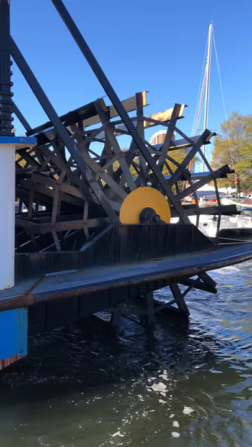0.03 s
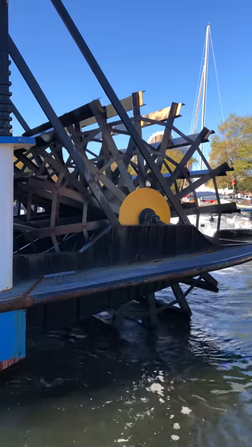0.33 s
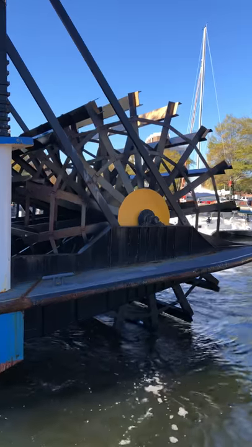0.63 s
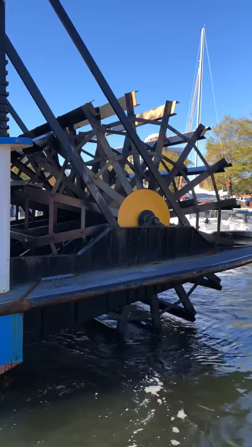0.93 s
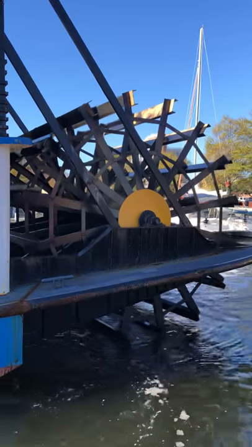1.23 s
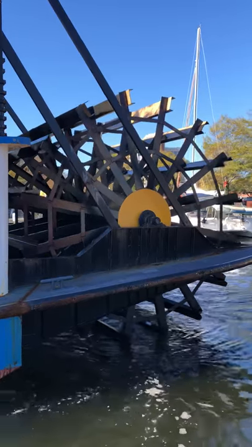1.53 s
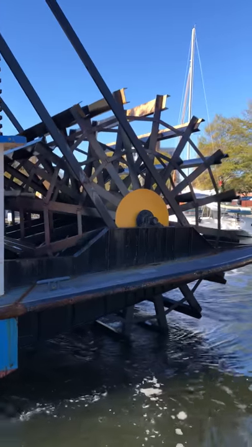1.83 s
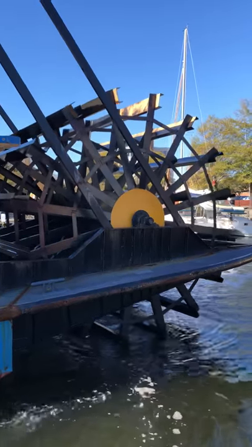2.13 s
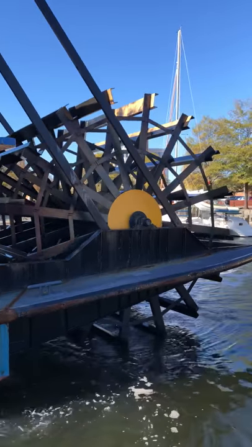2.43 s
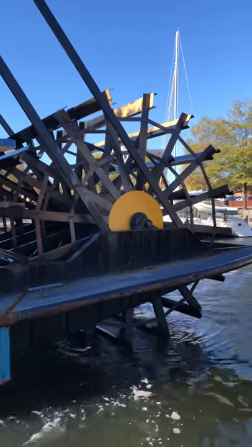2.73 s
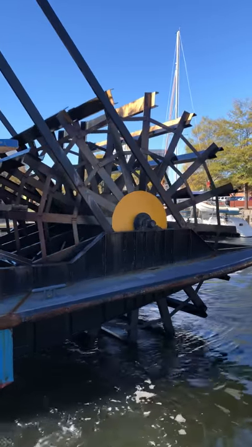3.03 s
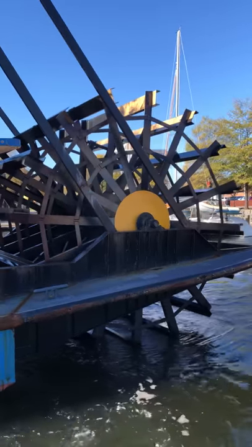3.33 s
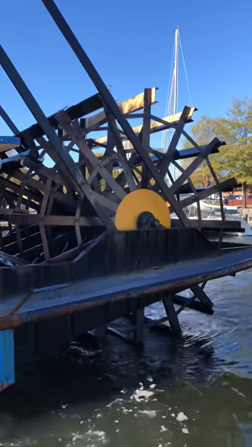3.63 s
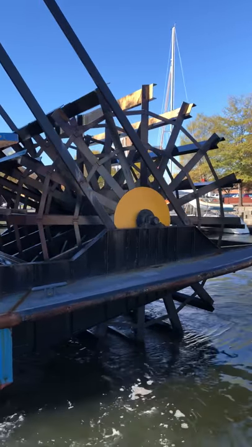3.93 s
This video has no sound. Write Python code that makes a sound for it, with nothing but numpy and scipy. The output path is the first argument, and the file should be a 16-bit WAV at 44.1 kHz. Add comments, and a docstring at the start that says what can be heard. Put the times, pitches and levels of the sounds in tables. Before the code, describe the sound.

Boat engines drone and rumble throughout, heard from beside the paddle wheel on a river. Faint whines and softly bubbling water lie underneath, with small scattered splashes and, toward the end, a few short drips.

```python
"""Paddle boat at the stern wheel

Two diesel exhausts throb slightly out of step and beat, until one fades from earshot.
Hull rumble, generator hum, machinery roar and thin whines lie under them.
The slow wheel churns the river: hiss, splashes, and drips whose trapped bubbles ring."""
import sys
import numpy as np
from scipy import signal
from scipy.fft import rfft, irfft
from scipy.io import wavfile
from scipy.ndimage import uniform_filter1d

SR = 44100
rng = np.random.default_rng(int(sys.argv[2]) if len(sys.argv) > 2 else 0)


def generate_wav(signal):
    """Clip the signal to [-1, 1] and save it as 16-bit WAV at the path in sys.argv[1]."""
    frames = np.transpose(np.atleast_2d(signal))
    scaled = np.clip(frames, -1, 1) * 32767
    pcm = np.round(scaled).astype(np.int16)
    wavfile.write(sys.argv[1], SR, pcm)


N = 176400

# near engine speed (time [s], firing rate [Hz])
NEAR_FIRING_HZ = [(0.2, 55.61), (0.45, 55.44), (0.8, 55.75), (1.3, 55.88), (1.9, 55.72), (2.4, 55.81),
                  (2.9, 55.65), (3.4, 55.83), (3.8, 55.84)]
# exhaust lines (order [multiple of shaft rate])
ORDERS = (5, 6, 7, 9, 10, 11, 12, 15, 16, 18, 20, 23, 24, 27, 30)
# line strengths per engine, one per order (base level [dB])
NEAR_LINES_DB = [-40, -24.5, -31, -22, -41, -27.5, -24, -21, -40.5, -37, -39.5, -41, -40.5, -52.5, -43.5]
FAR_LINES_DB = [-44, -24.5, -32, -26, -43, -32, -27.5, -24.5, -41, -35, -41, -45, -40, -49, -49]
# near lines that swell and sink (order [multiple of shaft rate])
SWELL_ORDERS = (6, 9, 15)
# their swells (time [s], gain [dB] for each of SWELL_ORDERS)
SWELLS_DB = [(.3, 2.4, -3, -2), (.7, 0.34, -0.93, -0.63), (1.1, 1.9, -1.9, 2.8), (1.5, -0.23, 1.7, 1.3),
             (2.2, -.5, 0.96, -0.83), (3, -0.12, -0.72, -1.45), (3.8, -2.7, .5, -0.28)]
# each exhaust at the listener (time [s], gain [dB])
NEAR_GAIN_DB = [(.1, -0.5), (.6, -1.5), (1.2, 0.6), (1.8, -0.7), (2.3, -0.1), (3.1, -0.24), (3.9, 2.1)]
FAR_GAIN_DB = [(.1, -.5), (.9, 1), (1.15, 0), (1.45, -10), (1.8, -16), (4, -19)]
# hull rumble, machinery roar, churned water (frequency [Hz], relative density [dB])
RUMBLE_SPECTRUM = [(20, -35), (32, -30), (43, -11), (58, -7), (75, -11.5), (92, -5.5), (135, -1.5),
                   (240, -2.5), (300, -1.5), (370, -9), (520, -23), (1200, -71)]
ROAR_SPECTRUM = [(150, -6), (420, 0), (520, -3), (640, -2), (820, -4), (1050, -8), (1350, -12.5),
                 (1700, -15), (2050, -20), (2400, -26.5), (4000, -35.5), (9000, -55.5)]
WASH_SPECTRUM = [(500, -10.5), (1500, 3.5), (2800, -0.5), (4000, -3), (5300, -4), (7000, -8), (8700, -10.5),
                 (10000, -14.5), (12000, -16.5), (15500, -23.5)]
# machinery whines (frequency [Hz], level [dB])
WHINE_TONES = [(569, -47), (1997, -60.5), (2110, -55)]
# water off the paddles (start [s], level before envelope [dB], decay [s], centre [Hz])
PADDLE_SPLASHES = [(.65, -49, 0.023, 6000), (.82, -45, .1, 3300), (1.206, -52, 0.23, 5200),
                   (1.808, -45, .04, 4000), (1.92, -48.5, .1, 4800), (2.51, -51, .03, 8000),
                   (2.596, -46, 0.077, 4200), (3.022, -53, .04, 7000), (3.086, -49, 0.036, 5000),
                   (3.244, -48, .04, 4500), (3.503, -51, 0.039, 6000), (3.613, -49, .02, 3800),
                   (3.71, -52, .03, 4000), (3.804, -39, .03, 3700)]
# fat drips (start [s], peak level [dB], initial pitch [Hz])
FAT_DRIPS = [(2.597, -40, 3300), (2.981, -32, 2650), (3.612, -32, 2750), (3.817, -39, 4250)]


def exhaust(firings, lines_db, swells_db, firings_per_turn=3, scatter_db=1.0):
    """One pressure pulse per firing, smeared by pipe and air; unequal cylinders add shaft orders."""
    strength = undb(scatter_db * np.interp(firings - firings[0], np.arange(400), rng.standard_normal(400)))
    shaft_rad = 2 * np.pi * firings / firings_per_turn
    tone = 0
    for order, db in zip(ORDERS, lines_db):
        smear_rad = .018 * (order - 11) ** 2 + .035 * walk(4.35)
        wave = np.sin if order % firings_per_turn else np.cos  # unevenness falls beside the firing peak
        gain = undb(db + swells_db.get(order, 0) + .5 * walk(4.7))
        tone += gain * wave(order * shaft_rad + smear_rad)
    return -np.sqrt(2) * tone * strength


def engines(t, far_firing_hz=54.08, in_step_s=.9805, far_lag_s=.0002):
    """Two diesels; the far one runs steadily and a little slower, so the pair beats."""
    near_firings = np.cumsum(curve(t, NEAR_FIRING_HZ)) / SR
    near_firings -= np.interp(in_step_s, t, near_firings)
    far_firings = far_firing_hz * (t - in_step_s - far_lag_s)
    times_s, *columns_db = np.array(SWELLS_DB).T
    swells_db = {order: np.interp(t, times_s, db) for order, db in zip(SWELL_ORDERS, columns_db)}
    near = exhaust(near_firings, NEAR_LINES_DB, swells_db) * undb(curve(t, NEAR_GAIN_DB))
    far = exhaust(far_firings, FAR_LINES_DB, {}) * undb(curve(t, FAR_GAIN_DB))
    return near + far


def machinery(t, rumble_db=-22.5, roar_db=-27, hum_db=-37, hum_hz=60.6):
    """Hull rumble, fluttering roar, generator hum and wavering whines."""
    rumble = noise(RUMBLE_SPECTRUM) * undb(rumble_db)
    roar = noise(ROAR_SPECTRUM) * undb(roar_db + .87 * walk(45.07))
    tones = undb(hum_db) * np.sin(2 * np.pi * hum_hz * t)
    for hz, db in WHINE_TONES:
        gain = undb(db + 2 * walk(5.13))
        pitch_hz = hz * (1 + .00298 * walk(20))
        tones += gain * np.sin(2 * np.pi * np.cumsum(pitch_hz) / SR)
    return rumble + roar + np.sqrt(2) * tones


def wash(level_db=-43.5):
    """Water stirred by the wheel hisses, with slight swell and flicker."""
    return noise(WASH_SPECTRUM) * undb(level_db + .5 * walk(4.6) + .5 * walk(60))


def splashes(t, attack_s=.0032, width_ratio=1.17, grain_db=.5):
    """Sheets of water slap the river: quick rise, then grainy, fading spray."""
    out = np.zeros(N)
    for start_s, db, decay_s, hz in PADDLE_SPLASHES:
        age_s = np.maximum(t - start_s, 0)
        envelope = (1 - np.exp(-age_s / attack_s)) * np.exp(-(age_s / decay_s) ** 2)
        grains = rng.standard_normal(N) * undb(-grain_db * walk(700))
        band = signal.iirpeak(hz, 1 / width_ratio, fs=SR)
        spray = signal.lfilter(*band, signal.lfilter(*band, grains))
        out += level(spray, db) * envelope
    return out


def drips(t, decay_s=.0045, chirp_per_s=3.4):
    """Each fat drip traps a bubble that rings and rises in pitch."""
    out = np.zeros(N)
    for start_s, db, hz in FAT_DRIPS:
        age_s = np.maximum(t - start_s, 0)
        phase_rad = 2 * np.pi * hz * age_s * (1 + chirp_per_s * age_s)
        out += undb(db) * np.exp(-age_s / decay_s) * np.sin(phase_rad)
    return out


def bubbles(rate_per_s=500, low_hz=1500, high_hz=12000, decay_cycles=6.1, tilt_db_per_oct=-3, level_db=-52):
    """Many tiny bubbles ring briefly and rise in pitch."""
    out = np.zeros(N + SR)
    for when, pitch, size, ring in rng.random((int(rate_per_s * N / SR), 4)):
        hz = low_hz * (high_hz / low_hz) ** pitch
        decay_s = decay_cycles * (.5 + ring) / hz
        age_s = np.arange(int(4 * decay_s * SR)) / SR
        gain = undb(-4 * np.log(1 - .99 * size) + tilt_db_per_oct * np.log2(hz / low_hz))
        phase_rad = 2 * np.pi * hz * age_s * (1 + .129 * age_s / age_s[-1])
        start = int(when * N)
        out[start:start + len(age_s)] += gain * np.exp(-age_s / decay_s) * np.sin(phase_rad)
    return level(out[:N], level_db)


def undb(db):
    """Decibels to gain."""
    return 10 ** (np.asarray(db) / 20)


def level(x, db):
    """Set the rms level."""
    return x * undb(db) / np.sqrt(np.mean(x ** 2))


def curve(t, rows):
    """Interpolate (time [s], value) rows."""
    return np.interp(t, *np.array(rows).T)


def walk(rate_hz):
    """Smooth random drift, spread about 1."""
    hold = int(SR / rate_hz)
    steps = np.repeat(rng.standard_normal(N // hold + 2), hold)
    return 1.38 * uniform_filter1d(uniform_filter1d(steps, hold), hold)[:N]


def noise(spectrum):
    """Unit-rms noise shaped by (frequency [Hz], density [dB]) rows."""
    hz, db = np.array(spectrum, float).T
    bins_hz = np.maximum(np.fft.rfftfreq(N, 1 / SR), 1)
    gain = undb(np.interp(np.log(bins_hz), np.log(hz), db))
    return level(irfft(rfft(rng.standard_normal(N)) * gain, N), 0)


def scene():
    """Engines, machinery and the wheel's water, in mono."""
    t = np.arange(N) / SR
    return (engines(t) + machinery(t) + wash() + splashes(t) + drips(t) + bubbles())[None]


def record(dry, low_cut_hz=38, high_cut_hz=15700, onset_s=.083):
    """The microphone drops the deepest bass and the top; the sound sets in abruptly."""
    bins_hz = np.fft.rfftfreq(N, 1 / SR)
    thinned = irfft(rfft(dry) * (1 - np.exp(-(bins_hz / low_cut_hz) ** 8)), N)
    gate = np.clip((np.arange(N) / SR - onset_s) / .002, 0, 1)
    lowpass = signal.ellip(10, .2, 80, high_cut_hz, fs=SR, output="sos")
    return signal.sosfilt(lowpass, thinned * gate)


dry = scene()
out = record(dry)
generate_wav(out)
```